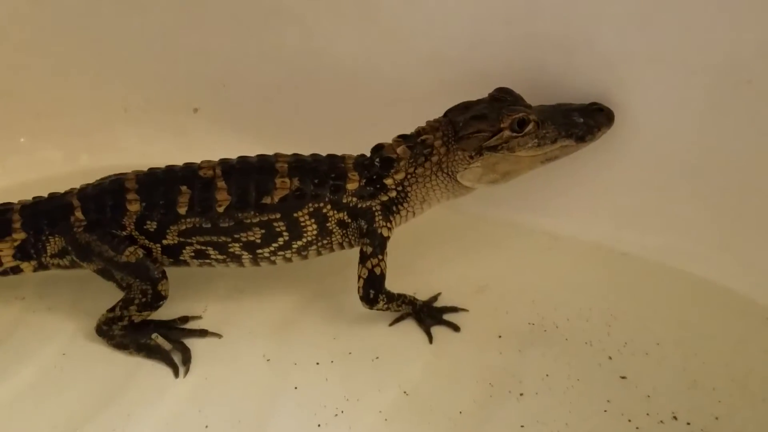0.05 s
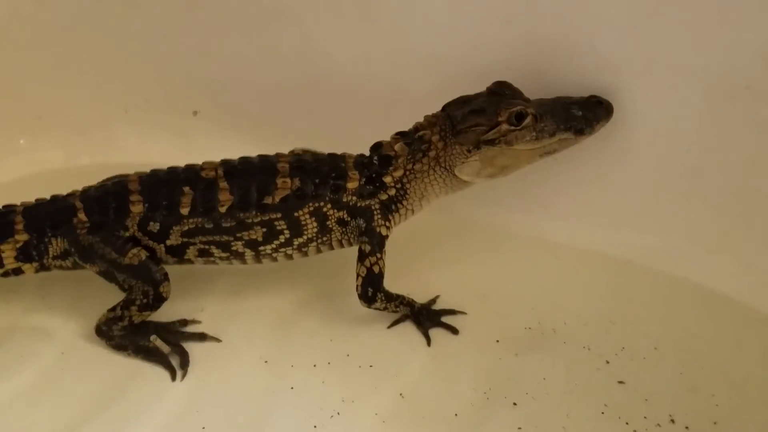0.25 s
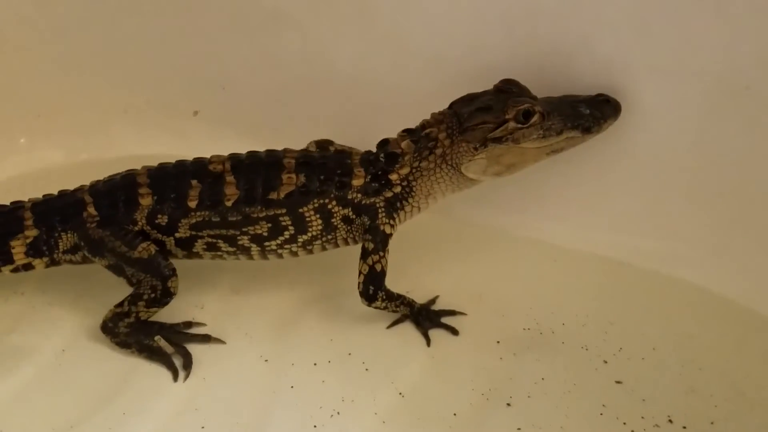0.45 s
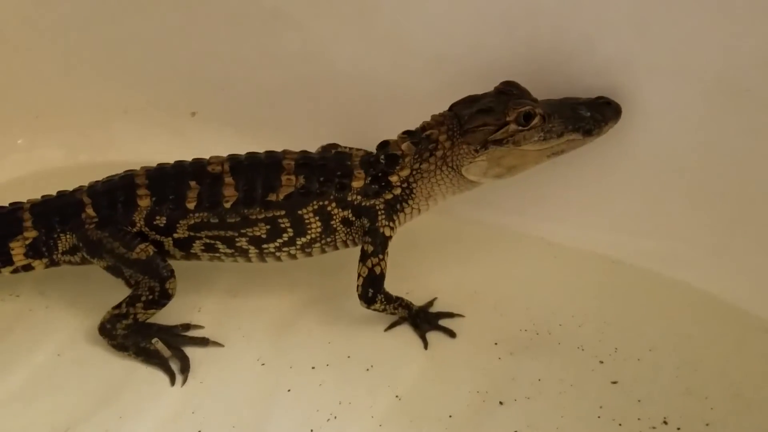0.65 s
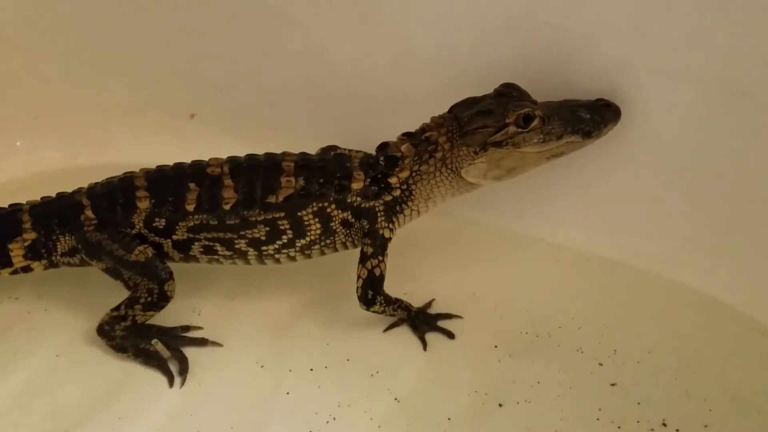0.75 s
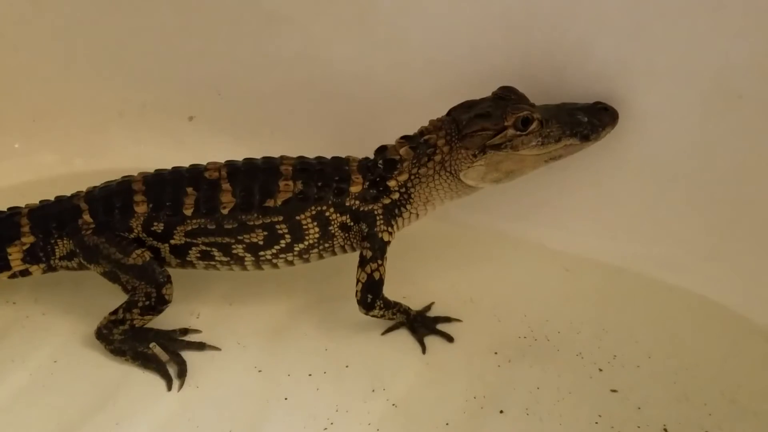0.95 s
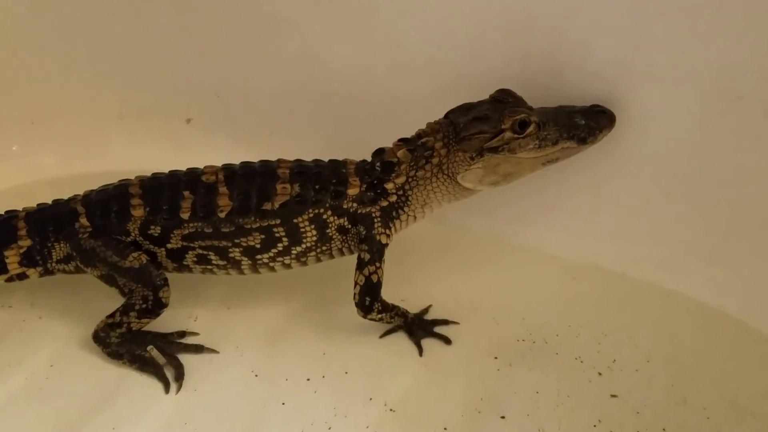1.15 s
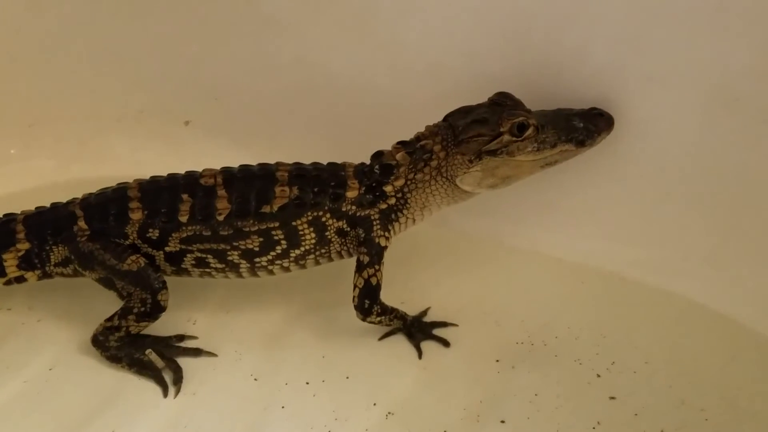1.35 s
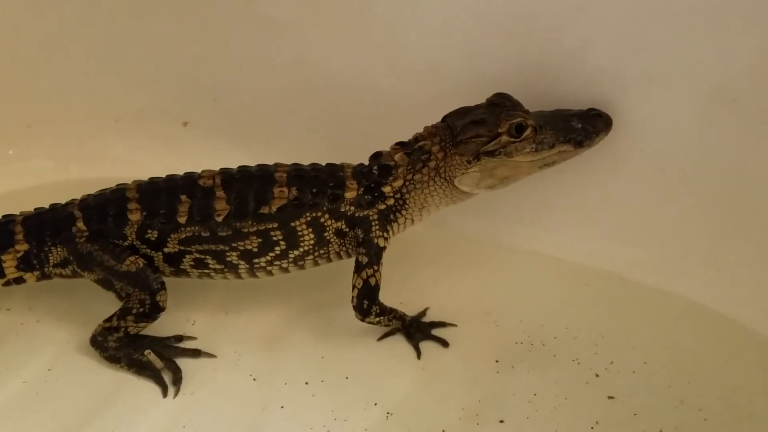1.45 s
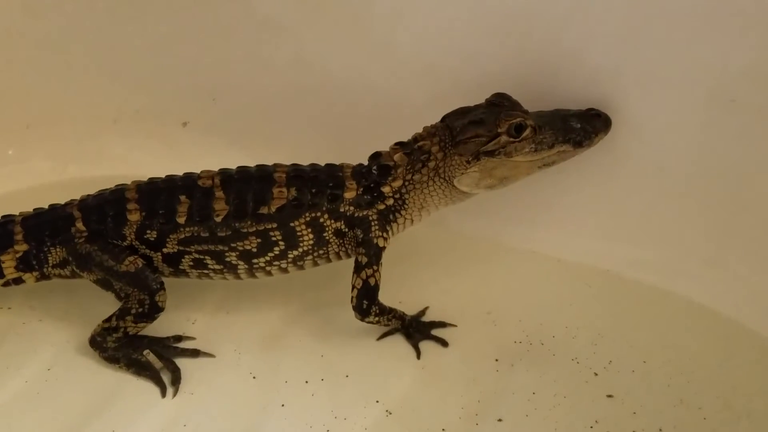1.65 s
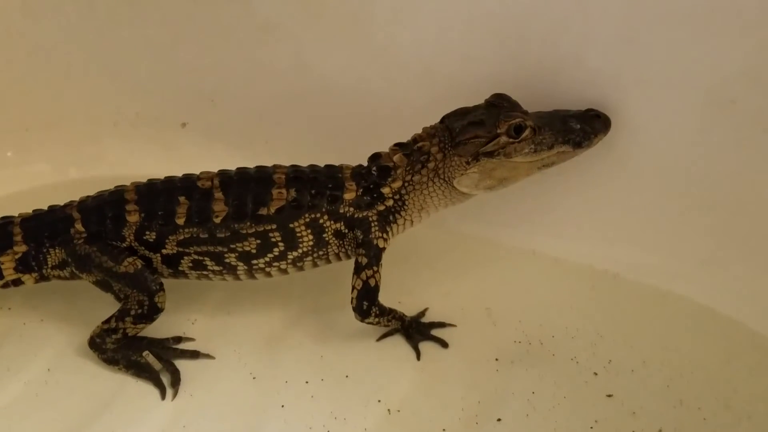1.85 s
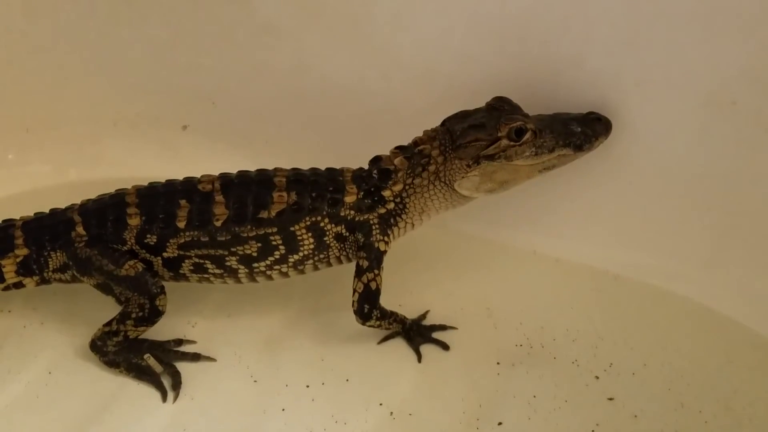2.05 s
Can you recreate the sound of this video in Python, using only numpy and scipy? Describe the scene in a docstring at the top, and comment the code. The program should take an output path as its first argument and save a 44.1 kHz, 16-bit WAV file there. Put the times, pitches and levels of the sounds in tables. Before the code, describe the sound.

Close up in a bathtub, a small alligator chirps once, a quick falling call with a hollow ring. Faint lapping, little gurgles, soft thuds and light scrapes on the tub follow, with a tiny click, over quiet room rumble.

```python
"""A young alligator chirps once in a bathtub: the pulses of its larynx ring its throat, plunging
from a squeak to a rattle, and the tub booms. Then the shallow water stirs: small bubbles gurgle,
dull thuds swell, light scrapes ring the tub's hard shell, and there is one sharp click.
A low room rumble lies under it all."""
import sys
import numpy as np
from scipy import signal
from scipy.fft import rfft, irfft
from scipy.io import wavfile

SR = 44100
rng = np.random.default_rng(int(sys.argv[2]) if len(sys.argv) > 2 else 0)


def wav_out(sig):
    """Save sig, one row per channel (or a flat mono array), as 16-bit PCM at SR to the path in sys.argv[1]."""
    wavfile.write(sys.argv[1], SR, np.round(np.clip(np.atleast_2d(sig).T, -1, 1) * 32767).astype(np.int16))


N = 92610

# Pitch dive and effort of the larynx: time_s, pulse_rate_hz, strength_db
CHIRP_CURVE = [(0.18, 1490, -33.5), (0.194, 984, -15.5), (.203, 723, -11.5), (0.212, 551, -13.5),
               (.218, 401.6, -6.5), (0.239, 251, -5), (0.2545, 182.5, -2.5), (0.263, 150.5, -6.5),
               (0.2737, 129.6, 0.5), (.2876, 79.3, -12)]
# Tone of the throat: frequency_hz, gain_db
THROAT_EQ = [(60, -62.5), (150, -14.5), (230, -14), (310, -1), (420, 6.5), (600, 4), (790, -7.5), (930, -6),
             (1250, -17), (1950, -15), (2700, -26.5), (4200, -38), (5200, -42.5), (6500, -54), (8500, -57),
             (15000, -74)]
# Early echoes off the tub walls: delay_s, left_gain, right_gain
WALL_ECHOES = [(.0021, .15, .06), (.0123, 0.35, 0.12), (.0185, 0.23, 0.11), (.0315, 0.31, 0.2),
               (0.0402, .12, 0.14), (0.0505, 0.087, 0.088)]
# Boomy air resonances of tub and bathroom: pitch_hz, gain_db, t60_s
AIR_MODES = [(284, 0, .35), (388, -3, .35), (437, -1, .42), (486, -1, .38), (538, -1, .35), (578, -3, .32),
             (629, -2, .35), (685, -7, .3), (858, -5, .28), (917, -6, .28), (984, -5, .28)]
# Single bubbles, each 20 dB down after its length: start_s, pitch_hz, level_db, length_s
BUBBLE_HITS = [(0.418, 1012, -46.5, 0.052), (0.464, 1424, -49.5, 0.048), (0.622, 950, -48, 0.022),
               (0.772, 1710, -45.5, 0.014), (0.778, 2060, -49.5, 0.022), (.89, 1370, -36, .02),
               (1.019, 1386, -37, 0.024), (1.085, 983, -26.5, 0.016), (1.091, 1357, -26, 0.0075),
               (1.148, 1347, -22.5, 0.011), (1.164, 1388, -50, 0.014), (1.165, 1018, -35.5, 0.015),
               (1.243, 1311, -30, 0.017), (1.254, 933, -36.5, 0.032), (1.357, 1288, -38, 0.032),
               (1.383, 1096, -42.5, 0.038), (1.416, 1393, -35.5, 0.018), (1.469, 940, -37.5, 0.021),
               (1.508, 1416, -46.5, 0.051), (1.721, 1870, -51, 0.019), (1.733, 2187, -55, 0.032)]
# Ring of the tub's hard shell: pitch_hz, gain_db, t60_s
SHELL_MODES = [(208.7, 0.5, 0.14), (278, -2.5, 0.1), (652, 16, .7), (1308, 8, .45), (2638, 1, .35),
               (3354, -2, .35), (929, -4.5, .25), (1001, -8, 0.067), (1055, -3.5, 0.16), (1371.4, 3, 0.28),
               (1748, 4, 0.1), (2146, 1, 0.11), (2920, -17.5, 0.124), (4266, 0, 0.16)]
# Short scrapes on the shell: start_s, level_db, decay_s, bright_spot_hz
SCRAPE_HITS = [(.363, -62, 0.013, 5740), (0.817, -56.5, 0.0078, 7400), (0.868, -47, 0.0036, 7860),
               (0.887, -41, 0.0046, 8200), (0.937, -54.5, 0.012, 6100), (0.96, -47.5, 0.0083, 7870),
               (1.012, -47.5, 0.017, 4640), (1.097, -49, 0.0076, 2780), (1.125, -52.5, 0.014, 10200),
               (1.161, -50, 0.011, 3280), (1.177, -50, 0.0055, 8200), (1.194, -46, 0.011, 4580),
               (1.305, -45, 0.004, 7700), (1.42, -52.5, 0.0049, 3670)]
# Tone of the scraping grit: frequency_hz, gain_db
SCRAPE_EQ = [(300, 1.5), (1500, 9.5), (3000, 6.5), (4500, -1), (6700, -4), (7550, 4), (8600, -14),
             (10200, 0), (12000, -6.5), (15500, -9.5)]
# Swell of the stirring water: time_s, level_db
STIR_FADER = [(0, -59), (.7, -61.5), (.77, -51.5), (.92, -52.5), (1.0, -55), (1.1, -44.5), (1.18, -42),
              (1.3, -46.5), (1.42, -48), (1.52, -51.5), (1.62, -58), (1.8, -61), (2.1, -68.5)]
# Tone of the lapping: frequency_hz, gain_db
STIR_EQ = [(60, -42), (130, -5), (220, 2), (450, -1), (650, -0.5), (800, 1), (1050, 1), (1450, -5.5),
           (2000, -9.5), (4000, -19), (8000, -29), (15000, -40)]
# Dull thuds of moving water: peak_s, level_db, half_length_s
THUD_SWELLS = [(0.766, -49.5, 0.012), (1.206, -48, 0.039), (1.39, -56.5, 0.13)]
# Tone of the room rumble: frequency_hz, gain_db
RUMBLE_EQ = [(20, -30), (48, -23.5), (68, -3), (120, -2), (190, -9.5), (440, -10), (800, -18),
             (1500, -24.5), (3000, -31), (6000, -36), (9000, -44.5), (14000, -36.5)]

JITTER_CYCLES, SHIMMER_DB, RASP_DB = 0.011, -1.25, -29
TENSE_RATE_HZ, OVERTONE_HZ, OVERTONE_DB = 900, 2200, 2
RIGHT_LEAD_S, BOOM_DB = 0.00031, 4
BUBBLE_RISE, BUBBLE_ATTACK_S, SPLASH_DB = 0.082, 0.002, -7
SCRAPE_ATTACK_S, BRIGHT_SPOT_DB = 0.0024, 8.5
CLICK_S, CLICK_HZ = 1.255, 13800
LAPS_PER_S = 2500
RUMBLE_DB, LOW_END_PAN_DB = -54.5, -3
ROOM_T60_S, ROOM_BUILD_S = 0.3, 0.005


def alligator_voice(t):
    """Slowing, slightly uneven pulses of the larynx ring the throat, each with a puff of rasp."""
    time_s, rate_hz, strength_db = np.array(CHIRP_CURVE).T
    rate = np.exp(np.interp(t, time_s, np.log(rate_hz)))
    cycles = np.cumsum(rate) / SR
    cycles -= np.interp(time_s[-1], t, cycles)  # zero at the closing pulse
    beats = -np.arange(-np.interp(time_s[0], t, cycles))
    jitter, shimmer = rng.standard_normal((len(beats), 2)).T
    pulse_times = np.interp(beats + JITTER_CYCLES * jitter, cycles, t)
    pulse_gains = undb(np.interp(pulse_times, time_s, strength_db) + SHIMMER_DB * shimmer)
    pulses = sum(gain * impulse(at) for at, gain in zip(pulse_times, pulse_gains))
    effort = undb(np.interp(t, time_s, strength_db)) * (t > time_s[0]) * (t < time_s[-1])
    rasp = undb(RASP_DB) * effort * np.exp(-(cycles % 1) / 0.42) * rng.standard_normal(N)
    voice = undb(15.5) * convolve(pulses + rasp, eq_response(THROAT_EQ))
    tension = np.clip(rate / TENSE_RATE_HZ, 0, 1)  # a tight larynx has stronger overtones
    return voice + undb(OVERTONE_DB) * tension * low_cut(voice, OVERTONE_HZ, order=1)


def tub_acoustics(voice):
    """The voice, right of centre, slaps off the tub walls and sets the air booming."""
    direct = convolve(voice, np.array([impulse(RIGHT_LEAD_S), impulse(0)]))
    echoes = sum(np.outer([left, right], impulse(delay)) for delay, left, right in WALL_ECHOES)
    walls = convolve(direct, echoes)
    boom = undb(BOOM_DB) * ring(direct, AIR_MODES)
    return pan(-4.5) * (direct + walls + boom) + undb(-3.5) * bathroom(voice)


def bubbles(t):
    """Each bubble rings briefly, rising in pitch, in a small splash; the shell rings along."""
    gurgle = np.zeros((2, N))
    for start, hz, db, length in BUBBLE_HITS:
        age = np.maximum(t - start, 0)
        pitch = hz * (1 + BUBBLE_RISE * np.minimum(age / length, 1))
        phase = 2 * np.pi * np.cumsum(pitch * (age > 0)) / SR
        splash = unit(steep_band(rng.standard_normal((2, N)), hz, width_hz=0.58 * hz))
        envelope = np.minimum(age / BUBBLE_ATTACK_S, 1) * np.exp(-np.log(10) * age / length)
        gurgle += undb(db) * envelope * (np.sin(phase) + undb(SPLASH_DB) * splash)
    return gurgle + undb(-2.5) * ring(gurgle, SHELL_MODES) + undb(1) * bathroom(gurgle)


def scrapes(t):
    """Brief gritty contacts, each with its own bright spot, leave the shell ringing."""
    noise = unit(eq(rng.standard_normal((2, N)), SCRAPE_EQ))
    grit = np.zeros((2, N))
    for start, db, decay, hz in SCRAPE_HITS:
        age = np.maximum(t - start, 0)
        rub = undb(db) * np.minimum(age / SCRAPE_ATTACK_S, 1) * np.exp(-age / decay) * noise
        grit += rub + undb(BRIGHT_SPOT_DB) * band(rub, hz, width_hz=770)
    ringing = grit + undb(19) * ring(grit, SHELL_MODES)
    return pan(4.5) * (ringing + undb(-4) * bathroom(ringing))


def click():
    """One tiny, very bright snap to the right."""
    ping = band(impulse(CLICK_S), CLICK_HZ, width_hz=1800)
    snap = undb(-19) * low_cut(ping, 0.84 * CLICK_HZ, order=10)
    return pan(-12) * snap + undb(-5) * bathroom(snap)


def stirring_water(t):
    """A dense patter of small laps against the shell swells and settles."""
    mid, side = (rng.random(N) < LAPS_PER_S / SR) * rng.standard_normal((2, N))
    laps = eq(mid + undb(-3.5) * np.array([side, -side]), STIR_EQ)
    swell = undb(np.interp(t, *np.array(STIR_FADER).T))
    water = swell * unit(laps + undb(8.5) * ring(laps, SHELL_MODES))
    return water + undb(-3) * bathroom(low_cut(water, hz=390, order=2))


def water_thuds(t):
    """The shifting water shakes the tub's lowest resonance."""
    push = sum(undb(db) * np.exp(-((t - peak) / half) ** 2) for peak, db, half in THUD_SWELLS)
    noise = low_cut(rng.standard_normal(N), hz=58, order=6)
    return pan(LOW_END_PAN_DB) * push * unit(steep_band(noise, hz=84, width_hz=75))


def room_rumble():
    """A steady bed of room noise coloured by the tub: narrow in the bass, wide in the treble."""
    mid, side = eq(rng.standard_normal((2, N)), RUMBLE_EQ)
    tub_hum = undb(5) * band(mid, hz=436, width_hz=42)  # an air resonance the noise keeps alive
    mid = mid + undb(-9.5) * ring(mid, AIR_MODES) + tub_hum
    side = low_cut(side, hz=1780, order=1)
    return undb(RUMBLE_DB) * pan(LOW_END_PAN_DB) * unit(np.array([mid + side, mid - side]))


def bathroom(x):
    """A short, diffuse reverb tail, different in each ear."""
    t = np.arange(N) / SR
    build = 1 - np.exp(-(t / ROOM_BUILD_S) ** 2)
    tail = rng.standard_normal((2, N)) * np.exp(-np.log(1000) * t / ROOM_T60_S) * build
    return convolve(x, tail / np.sqrt(np.sum(tail ** 2) / 2))


def undb(db):
    """Decibels to gain."""
    return 10 ** (np.asarray(db) / 20)


def unit(x):
    """Scale to rms 1."""
    return x / np.sqrt(np.mean(x ** 2))


def pan(db):
    """Stereo gains, with the left db louder than the right."""
    return undb(np.array([[db], [-db]]) / 2)


def impulse(at_s, size=8):
    """A band-limited tick."""
    offset = np.arange(N) - at_s * SR
    tick, near = np.zeros(N), abs(offset) < size
    tick[near] = np.sinc(offset[near]) * np.sinc(offset[near] / size)
    return tick


def convolve(x, response):
    """Play x through an impulse response, per channel."""
    return signal.fftconvolve(np.atleast_2d(x), np.atleast_2d(response), axes=1)[:, :N]


def band(x, hz, width_hz):
    """One resonance, gain 1 at its centre."""
    return signal.lfilter(*signal.iirpeak(min(hz, SR / 2 - 1), hz / width_hz, fs=SR), x)


def steep_band(x, hz, width_hz):
    """Two like resonances in series."""
    return band(band(x, hz, width_hz), hz, width_hz)


def ring(x, modes):
    """A bank of decaying modes."""
    return sum(undb(db) * band(x, hz, np.log(1000) / np.pi / t60) for hz, db, t60 in modes)


def low_cut(x, hz, order):
    """Roll off the lows."""
    return signal.sosfilt(signal.butter(order, hz, "high", fs=SR, output="sos"), x)


def eq_gains(curve, size):
    """An EQ curve as one gain per FFT bin."""
    hz, db = np.array(curve).T
    bin_hz = np.maximum(np.fft.rfftfreq(size, 1 / SR), 1)
    return undb(np.interp(np.log(bin_hz), np.log(hz), db))


def eq(x, curve):
    """Colour a noise with an EQ curve."""
    return irfft(rfft(x) * eq_gains(curve, N), N)


def eq_response(curve, size=4096):
    """Minimum-phase impulse response of an EQ curve: it rings only after the hit."""
    cepstrum = irfft(np.log(eq_gains(curve, size)))
    cepstrum[1:size // 2] *= 2
    cepstrum[size // 2 + 1:] = 0
    return irfft(np.exp(rfft(cepstrum)))


def scene():
    """The chirp and the small sounds of the tub over a bed of water and rumble."""
    t = np.arange(N) / SR
    bed = room_rumble() + stirring_water(t) + water_thuds(t)
    return bed + scrapes(t) + bubbles(t) + click() + tub_acoustics(alligator_voice(t))


def record(dry):
    """A steep high cut at 15.8 kHz on the whole mix."""
    return signal.sosfilt(signal.ellip(10, .1, 80, 15800, fs=SR, output="sos"), dry)


dry = scene()
out = record(dry)
wav_out(out)
```